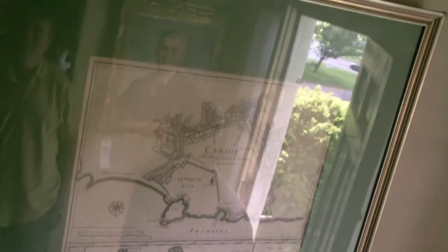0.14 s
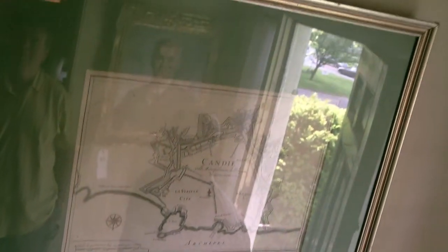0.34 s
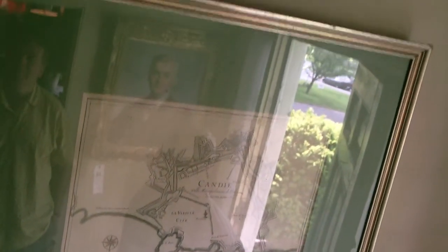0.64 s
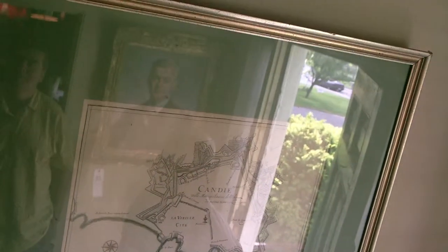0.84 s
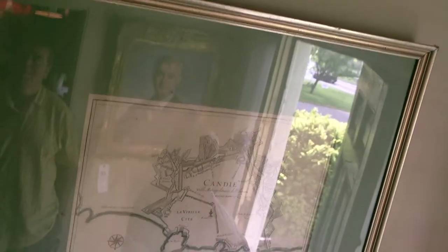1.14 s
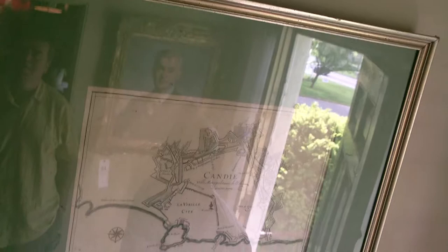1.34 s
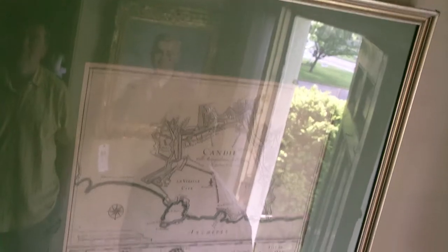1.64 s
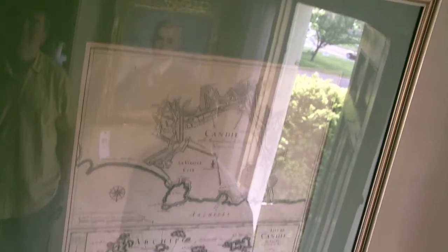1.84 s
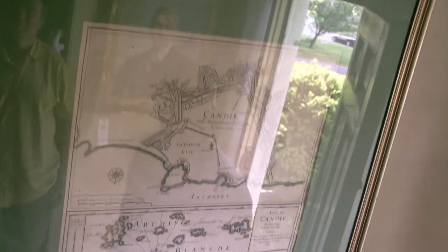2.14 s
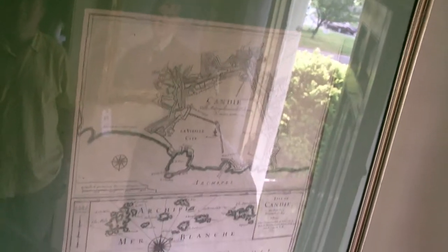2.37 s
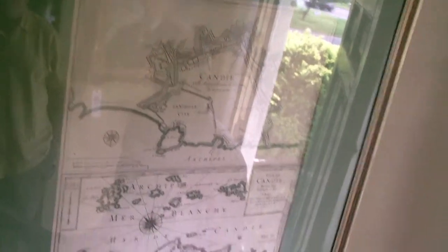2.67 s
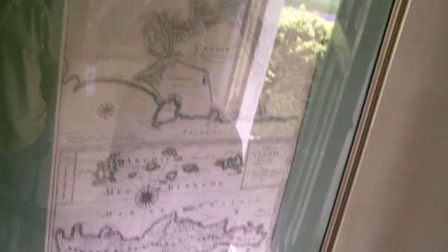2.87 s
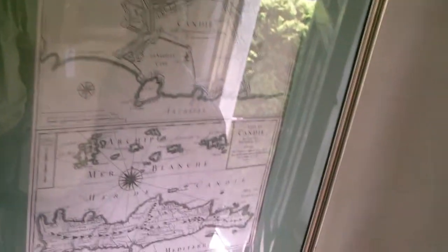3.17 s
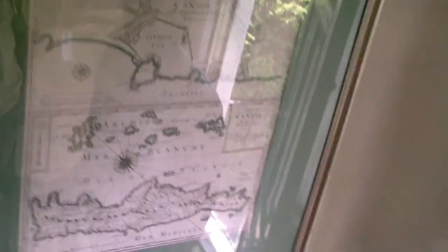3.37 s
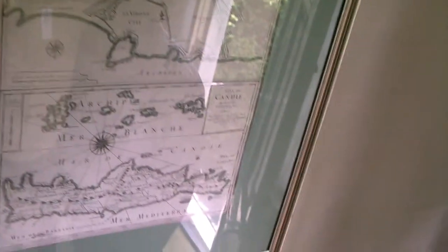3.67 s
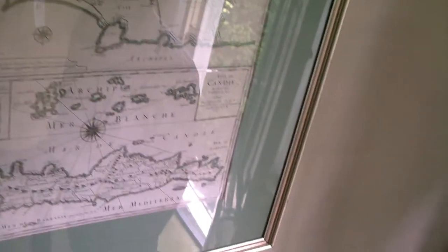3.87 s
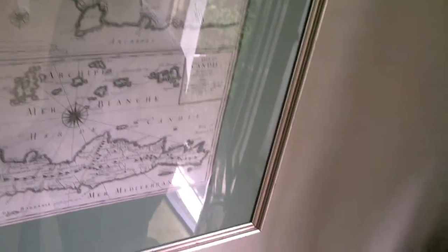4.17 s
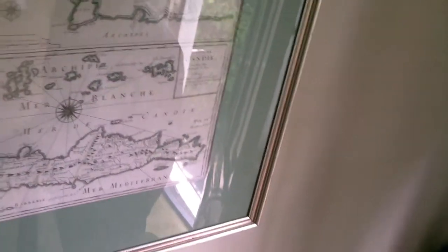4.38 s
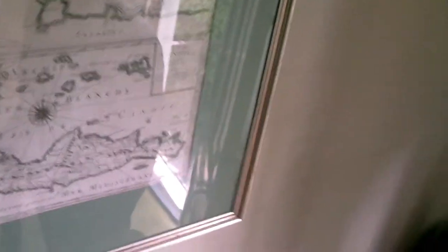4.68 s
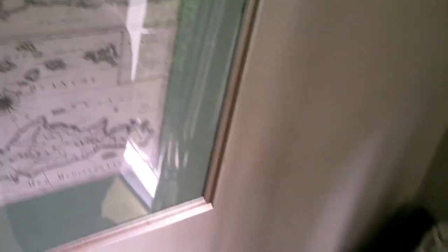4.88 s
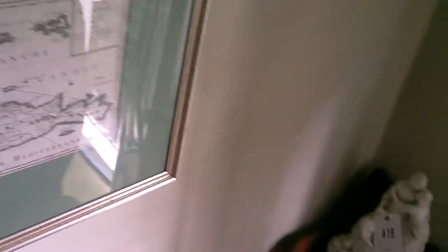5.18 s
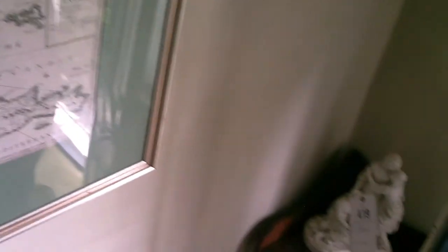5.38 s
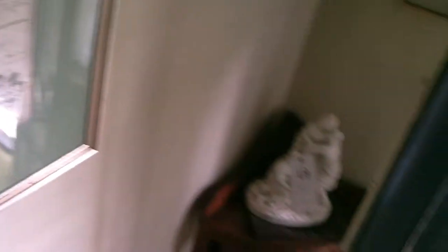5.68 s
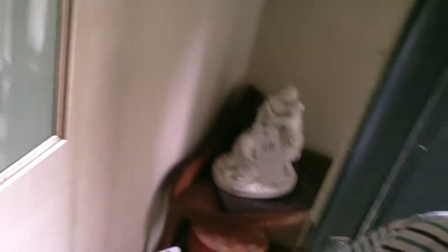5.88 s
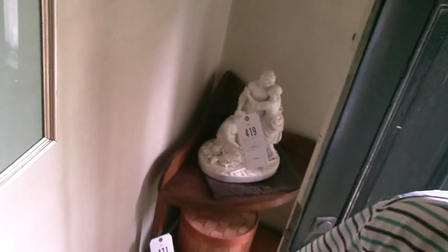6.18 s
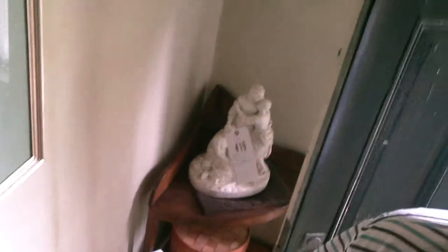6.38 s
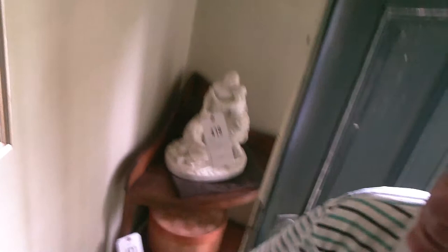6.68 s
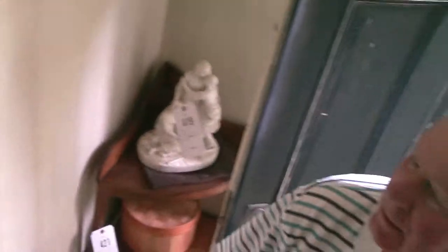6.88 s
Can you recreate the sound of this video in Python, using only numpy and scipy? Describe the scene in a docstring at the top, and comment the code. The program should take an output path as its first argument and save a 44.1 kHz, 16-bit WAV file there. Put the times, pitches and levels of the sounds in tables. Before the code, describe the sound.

A vehicle pulls away outside a quiet room with a low drone and tyre noise, while fingers tick on a handheld camera.

```python
"""A vehicle pulls away outside the open door of a quiet room: its exhaust drone climbs with the firing
rate and drops at a gear change, and its tyre roar swells past. Road noise lies behind it, and a near
wall's echo hollows one band of both. Far traffic booms in the room's modes beside a low hum.
Fingers tick and slip on a hand-held camera, cloth rustles, and the electronics whine faintly.
Low rumble surges now and then, and narrow tones near 500 Hz sound as the engine revs."""
import sys
import numpy as np
from scipy import signal
from scipy.fft import rfft, irfft
from scipy.io import wavfile
from scipy.ndimage import uniform_filter1d

SR = 44100
rng = np.random.default_rng(int(sys.argv[2]) if len(sys.argv) > 2 else 0)


def dump_mix(stems):
    """Bounce the given channels to the path in sys.argv[1] as a 16-bit WAV at rate SR."""
    frames = np.atleast_2d(stems).T  # one column per channel
    limited = np.clip(frames, -1, 1)  # hard clip at full scale
    pcm = np.round(limited * 32767).astype(np.int16)
    wavfile.write(sys.argv[1], SR, pcm)


N = 309582
TIME_S = np.arange(N) / SR


def gain_of(db):
    return 10 ** (np.asarray(db) / 20)


def lean_left(db):
    """Stereo gains: left up by db, right down by db."""
    return gain_of([[db], [-db]])


def unit_rms(x):
    return x / np.sqrt(np.mean(x ** 2) + 1e-20)


def over_frequency(rows, hz):
    """Table value at hz, interpolated in log frequency."""
    row_hz, value = np.transpose(rows)
    return np.interp(np.log(hz + 1), np.log(row_hz + 1), value)


def over_time(rows):
    """One per-sample curve for each column after time."""
    row_s, *columns = np.transpose(rows)
    return [np.interp(TIME_S, row_s, column) for column in columns]


def add(mix, start_s, sound):
    part = mix[..., round(start_s * SR):][..., :sound.shape[-1]]
    part += sound[..., :part.shape[-1]]


def resonate(x, hz, width_hz):
    """Unity-gain resonance: shift hz (fixed or sliding) to zero, smooth, shift back."""
    carrier = np.exp(2j * np.pi * np.cumsum(hz * np.ones(x.shape[-1])) / SR)
    pole = np.exp(-np.pi * width_hz / SR)
    return 2 * (carrier * signal.lfilter([1 - pole], [1, -pole], x / carrier + 1e-18)).real


def band(x, hz, width_hz):
    """Two equal resonances in series."""
    return resonate(resonate(x, hz, width_hz), hz, width_hz)


def drift(rate_hz):
    """Slow random curve, unit RMS."""
    span = max(round(SR / rate_hz), 1)
    return unit_rms(uniform_filter1d(uniform_filter1d(rng.standard_normal(N), span), span))


# Likeness of the two microphone ports: (frequency [Hz], coherence [0-1])
PORT_COHERENCE = [(60, 0.94), (130, 0.94), (290, 0.96), (640, 0.92), (1410, 0.84), (3100, 0.24),
                  (6820, 0.032), (15000, 0.28)]
# Port imbalance: (frequency [Hz], left minus right [dB])
PORT_BALANCE = [(60, 3), (240, 1), (950, 1.0), (3770, 1.5), (15000, 1)]
# Phase between the ports: (frequency [Hz], left lead [rad])
PORT_PHASE = [(100, 0), (1700, 0.19), (3600, 0.85), (5000, 0), (7000, 0.23)]


def port_spectra(fft_size):
    """Random short-time spectra at two ports, alike in the bass, mostly unrelated in the treble."""
    hz = np.fft.rfftfreq(fft_size, 1 / SR)
    a, b, c, d = rng.standard_normal((4 * N // fft_size + 5, len(hz), 4)).T
    coherence = over_frequency(PORT_COHERENCE, hz)[:, None]
    left = a + 1j * b
    right = coherence * left + np.sqrt(1 - coherence ** 2) * (c + 1j * d)
    tilt = gain_of(over_frequency(PORT_BALANCE, hz) / 2)[:, None]
    lag = np.exp(-1j * over_frequency(PORT_PHASE, hz))[:, None]
    return hz, np.array([left * tilt, right / tilt * lag])


def coloured_noise(spectrum, patch_db, ridge_db=2.46, fft_size=4096):
    """Unit-RMS stereo noise with drifting patches and the narrow, lasting ridges of standing waves."""
    hz, bins = port_spectra(fft_size)
    patches, ridges = rng.standard_normal((*bins.shape[:0:-1], 2)).T
    patches = unit_rms(uniform_filter1d(uniform_filter1d(patches, size=30, axis=0), size=5, axis=1))
    ridges = unit_rms(uniform_filter1d(uniform_filter1d(ridges, size=2, axis=0), size=30, axis=1))
    in_band = (hz >= spectrum[0][0]) & (hz <= spectrum[-1][0])
    level_db = over_frequency(spectrum, hz)[:, None] + patch_db * patches + ridge_db * ridges
    bins = bins * in_band[:, None] * gain_of(level_db)
    return unit_rms(signal.istft(bins, nperseg=fft_size, noverlap=fft_size * 3 // 4)[1][:, :N])


def electronics_whine(hz=8753, rms_db=-79):
    """Thin steady tone of the camera's electronics."""
    return np.sqrt(2) * gain_of(rms_db) * np.sin(2 * np.pi * hz * TIME_S)


# Microphone self-noise: (frequency [Hz], relative density [dB])
MIC_SPECTRUM = [(3000, -16), (7000, -5), (8600, 1.5), (10000, 1.5), (11500, -1), (13400, -1), (14500, 0.5),
                (15400, -3)]


def mic_noise(swell_db, base_db=-60):
    """Treble self-noise of the microphones, its level moved by swell_db."""
    return gain_of(base_db + swell_db) * coloured_noise(MIC_SPECTRUM, patch_db=2.0)


# Low room modes: (frequency [Hz], width [Hz], base level [dB])
ROOM_MODES = [(34, 24, -38), (52.84, 5.7, -29.5), (67.1, 12.7, -32), (76.45, 3.1, -35.5),
              (92.46, 12.7, -32.5)]
# Swell of the modes: (time [s], deep gain [dB], upper gain [dB])
MODE_SWELL = [(0, 6, 0), (.25, -2, 0), (1, 0, 3), (1.4, 0, -2), (2.8, 1, -4), (3.9, -2, -7), (4.3, 0, -5),
              (5.2, -7, -7), (5.7, -3, -5), (7.02, -1, -4)]


def room_boom(deep_below_hz=60):
    """Far traffic feeds each low mode of the room, which wanders in level."""
    out = np.zeros((2, N))
    deep_db, upper_db = over_time(MODE_SWELL)
    for hz, width_hz, db in ROOM_MODES:
        common, side = rng.standard_normal((2, N))
        rumble = np.array([common + 0.034 * side, common - 0.058 * side])
        swell_db = deep_db if hz < deep_below_hz else upper_db
        out += gain_of(db + swell_db) * unit_rms(band(rumble, hz, width_hz))
    return out * lean_left(db=.8)


# Hum from outside: (time [s], level [dB])
HUM_LEVEL = [(0, -40), (1.2, -43), (1.4, -32), (1.72, -31), (1.85, -43), (2.8, -43), (3.4, -50),
             (7.02, -50)]


def outside_hum(hz=116.2, width_hz=6.4):
    """Low tone plus narrow noise, strongest as the vehicle pulls away."""
    level_db, = over_time(HUM_LEVEL)
    waver = unit_rms(band(rng.standard_normal(N), hz, width_hz))
    steady = np.sqrt(2) * np.sin(2 * np.pi * hz * TIME_S)
    return gain_of(level_db) * (steady + 0.64 * waver) * lean_left(db=.8)


# Road noise: (time [s], low roar [dB], tyre roar [dB], hiss [dB])
ROAD_LEVELS = [(0, -36, -46, -53), (.6, -33.5, -47, -54), (1.15, -35, -43.5, -54), (1.4, -32.5, -48, -52.5),
               (2.25, -32, -42.5, -49.5), (4.35, -32.5, -41.5, -49), (4.65, -31.5, -42.5, -47),
               (5.5, -33.5, -42, -51), (5.95, -33, -41.5, -48.5), (6.6, -33.5, -44, -52),
               (7.02, -32.5, -43.5, -48.5)]
# Spectra of those three layers: (frequency [Hz], relative density [dB])
LOW_ROAR_SPECTRUM = [(12, -38), (20, -4), (81, -5.5), (98, -7), (134, -7), (195, -13.5), (300, -11.5),
                     (448, -18), (700, -19.5), (910, -69), (1540, -120)]
TYRE_SPECTRUM = [(400, -8), (520, -9.5), (680, -7), (800, 1.5), (1050, -2), (1600, -12.5), (2000, -12.5),
                 (2800, -19.5)]
HISS_SPECTRUM = [(1200, -41), (2000, -3), (3000, -4), (4500, -7.5), (6000, -12.5), (7200, -15),
                 (9000, -35.5)]


def road():
    """Low roar, tyre roar and hiss swell as vehicles go by; the microphone noise follows the hiss."""
    low_db, tyre_db, hiss_db = over_time(ROAD_LEVELS)
    flutter = drift(rate_hz=45)  # quick gusts shared across the treble
    low = gain_of(low_db) * coloured_noise(LOW_ROAR_SPECTRUM, patch_db=0.04)
    tyres = gain_of(tyre_db + 0.58 * flutter) * coloured_noise(TYRE_SPECTRUM, patch_db=0.03)
    hiss = gain_of(hiss_db + 0.37 * flutter) * coloured_noise(HISS_SPECTRUM, patch_db=1.24)
    return low + tyres + hiss + mic_noise(swell_db=0.62 * (hiss_db - hiss_db.mean()) + 0.39 * flutter)


# Ticks and low surges: (time [s], envelope peak [dB], pitch [Hz], rise [ms])
TICKS_AND_SURGES = [(2.159, -26, 850, 5), (2.356, -29, 855, 5), (2.808, -37, 3300, .7),
                    (2.817, -44, 3200, .6), (3.1409, -33, 3600, .1), (3.1414, -29, 2000, .22),
                    (4.015, -15, 72, 22), (4.1783, -40, 10500, .09), (4.6364, -28, 2100, .17),
                    (4.637, -27, 2900, .17), (5.655, -17, 55, 35), (6.228, -33, 2000, .2),
                    (6.278, -32, 1800, .15), (6.8156, -35, 3100, .16), (6.8543, -43, 5300, .3)]


def ticks_and_surges():
    """Sharp clicks, brief rings and two soft swells of low rumble: each a sine that swells and dies."""
    out, t = np.zeros((2, N)), TIME_S[:12000]
    for start_s, db, hz, rise_ms in TICKS_AND_SURGES:
        age = 1000 * t / rise_ms
        add(out, start_s, gain_of(db) * age * np.exp(1 - age) * np.sin(2 * np.pi * hz * t))
    return out


def burst(length_s, hz, width_hz, grain_db=2.5):
    """Soft, grainy burst of band noise."""
    n = round(length_s * SR)
    common, left, right, grains = rng.standard_normal((4, SR))
    roughness = gain_of(grain_db * grains.repeat(100)[:SR])
    noise = (common + .5 * np.array([left, right])) * roughness
    return unit_rms(band(noise, hz, width_hz)[:, -n:]) * np.hanning(n)


# Short noise swells: (time [s], length [s], body [dB], centre [Hz], width [Hz], fizz [dB])
NOISE_SWELLS = [(0, .17, -22.5, 56.4, 6, -64), (0, .33, -62, 4300, 700, -75),
                (1.29, 0.13, -35, 187, 52, -59), (1.36, 0.15, -39.5, 495, 15, -68),
                (1.46, .1, -44, 525, 19, -70), (1.65, 0.056, -40, 512, 27, -70),
                (1.98, 0.34, -33, 163, 100, -65), (4.45, .7, -62, 10500, 3500, -84),
                (4.56, 0.15, -69, 2600, 2200, -55), (6.101, 0.083, -60, 3020, 2000, -56),
                (6.226, 0.091, -42, 820, 990, -53), (6.522, 0.15, -19.5, 33, 19, -65),
                (6.545, 0.044, -39, 870, 650, -55), (6.802, 0.065, -40, 1550, 710, -51.5)]


def noise_swells():
    """An opening low boom, narrow tones near 500 Hz as the engine revs, and cloth and grip rustles."""
    out = np.zeros((2, N))
    for start_s, length_s, body_db, hz, width_hz, fizz_db in NOISE_SWELLS:
        body = gain_of(body_db) * burst(length_s, hz, width_hz)
        fizz = gain_of(fizz_db) * burst(length_s, hz=4230, width_hz=4500)
        add(out, start_s, body + fizz)
    return out


# Fingertip jerks: (time [s], level [dB])
FINGER_SLIPS = [(1.346, -57), (1.359, -55), (1.378, -56), (1.393, -54), (1.41, -56)]


def finger_slips():
    """A fingertip slips over the case in tiny bright jerks."""
    out = np.zeros((2, N))
    for start_s, db in FINGER_SLIPS:
        add(out, start_s, gain_of(db) * burst(length_s=.011, hz=5600, width_hz=2400))
    return out


# Band cancelled by the wall: (time [s], centre [Hz], depth [0-1])
WALL_NOTCH = [(0, 665, 0.4), (1.5, 662, 0.5), (3, 670, 0.58), (3.8, 637, 0.12), (4.5, 550, 0.16),
              (5.3, 483, 0.28), (7.02, 520, 0.53)]


def near_wall(x, width_hz=150):
    """The wall's echo partly cancels one band, which slides as the camera turns."""
    hz, depth = over_time(WALL_NOTCH)
    return x - depth * resonate(x, hz, width_hz)


# Close tyre roar: (time [s], level [dB])
PASS_LEVEL = [(0, -51), (.6, -43.5), (1.5, -43), (2.2, -37), (2.9, -40.5), (3.6, -41), (4.5, -44.5),
              (7.02, -48.5)]
# Its spectrum: (frequency [Hz], relative density [dB])
PASS_SPECTRUM = [(700, -7.5), (820, -0.5), (1200, -1), (1800, -5.5), (2100, -15.5), (3000, -22.5)]
# Bands singing in it: (centre [Hz], width [Hz], level re roar [dB])
SINGING_BANDS = [(865, 45, -14), (957, 35, -18), (1045, 35, -20)]


def passing_tyres(waver_db=3):
    """Bright tyre roar of the vehicle going by close; its singing bands come and go."""
    level_db, = over_time(PASS_LEVEL)
    roar = coloured_noise(PASS_SPECTRUM, patch_db=1.5)
    singing = sum(gain_of(db + waver_db * drift(rate_hz=11)) * unit_rms(band(roar, hz, width_hz))
                  for hz, width_hz, db in SINGING_BANDS)
    return gain_of(level_db) * (roar + singing)


# Door and room resonances: (centre [Hz], width [Hz], peak gain [dB], onset [s])
DOORWAY_RESONANCES = [(274, 21, 4, 4.3), (298.5, 4.5, 3, 4.3), (345, 70, 2, 2.35), (495, 40, -6, 0),
                      (592, 42, -4, 4), (648, 30, -1, 3.8)]


def doorway_gain(hz, fade_in_s=.25):
    """Resonances lift an overtone crossing them; the camera walks into each at its own time."""
    gain = np.zeros(N)
    for centre_hz, width_hz, peak_db, onset_s in DOORWAY_RESONANCES:
        arrived = np.clip((TIME_S - onset_s) / fade_in_s, 0, 1)
        gain += gain_of(peak_db) * arrived / (1 + (2 * (hz - centre_hz) / width_hz) ** 4)
    return gain


# Pull-away, slip, long climb, gear change: (time [s], firing rate [Hz])
FIRING_RATE = [(1.25, 48), (1.33, 55), (1.5, 78.5), (1.75, 77), (2.2, 68), (4, 83.4), (4.5, 89.3),
               (5.5, 99.6), (5.86, 102.8), (5.97, 93), (6.06, 78), (6.3, 68), (7.02, 71)]
# Drone booming and fading across the room's modes: (time [s], level [dB])
DRONE_LEVEL = [(1.25, -26), (1.36, -17), (1.45, -14), (1.6, -18), (1.64, -24), (1.7, -12), (1.92, -21),
               (1.99, -13), (2.26, -29), (2.45, -17), (2.56, -30), (2.78, -16), (3.27, -15), (3.4, -31.5),
               (3.48, -18.5), (3.84, -22), (3.9, -41), (4.08, -25.5), (4.17, -39), (4.45, -23),
               (4.68, -29.5), (4.9, -25.5), (5.3, -22), (5.45, -25.5), (5.54, -41), (5.67, -19.5),
               (5.78, -40), (5.92, -24.5), (6.01, -24.5), (6.13, -14), (6.26, -20), (6.32, -35), (6.4, -15),
               (6.48, -39), (6.59, -22.5), (6.65, -39), (6.73, -18), (6.85, -37), (6.94, -18.5),
               (7.02, -26.5)]
# Exhaust overtones: (multiple of firing rate, base level [dB])
EXHAUST_OVERTONES = [(3, -44), (4, -45), (5, -45), (6, -44), (7, -47.5)]
FULL_LOAD_HZ_PER_S, HARD_REV_HZ_PER_S = 8.4, 90
LUMPY_DB, OFF_LOAD_DB, HARD_REV_DB = 2.5, -15.5, -1
WAVER_DB, WAVER_RAD = 2.6, .8


def exhaust(ease_s=.15, fade_in_s=.073):
    """Near-pure drone at the firing rate; off load it turns lumpy and its wavering overtones weaken."""
    firing_hz, = over_time(FIRING_RATE)
    drone_db, = over_time(DRONE_LEVEL)
    climb_hz_per_s = uniform_filter1d(np.gradient(firing_hz) * SR, size=round(ease_s * SR))
    off_load = 1 - np.clip(climb_hz_per_s / FULL_LOAD_HZ_PER_S, 0, 1) ** 2
    hard_rev = np.clip(climb_hz_per_s / HARD_REV_HZ_PER_S, 0, 1) ** 2  # lets every overtone through
    phase = 2 * np.pi * np.cumsum(firing_hz * (1 + 0.0035 * drift(rate_hz=9.05))) / SR
    lumps_db = (0.16 + LUMPY_DB * off_load) * drift(rate_hz=16)
    out = gain_of(drone_db + lumps_db) * np.sin(phase)
    for multiple, db in EXHAUST_OVERTONES:
        lift = doorway_gain(multiple * firing_hz) + gain_of(HARD_REV_DB) * hard_rev
        level = gain_of(db + OFF_LOAD_DB * off_load + WAVER_DB * drift(rate_hz=12))
        out += lift * level * np.sin(multiple * phase + WAVER_RAD * drift(rate_hz=5.6))
    fade_in = np.clip((TIME_S - DRONE_LEVEL[0][0]) / fade_in_s, 0, 1)
    return np.sqrt(2) * out * fade_in * lean_left(db=.8)


def scene():
    """Street sound by way of the wall, plus the room's low end, brief sounds and the whine."""
    street = near_wall(exhaust() + road() + passing_tyres())
    low_end = room_boom() + outside_hum()
    brief_sounds = (ticks_and_surges() + noise_swells() + finger_slips()) * lean_left(db=.7)
    return street + low_end + brief_sounds + electronics_whine()


NOTCH_HZ, NOTCH_HALF_WIDTH_HZ, NOTCH_DB = 7740, 130, -27
CUTOFF_HZ = 15250


def record(dry):
    """Narrow treble notch, then the band limit."""
    hz = np.fft.rfftfreq(N, 1 / SR)
    notch = gain_of(NOTCH_DB / (1 + ((hz - NOTCH_HZ) / NOTCH_HALF_WIDTH_HZ) ** 4))
    notched = irfft(rfft(dry) * notch, N)
    lowpass = signal.firwin(511, CUTOFF_HZ, window=("kaiser", 9), fs=SR)
    return signal.oaconvolve(notched, lowpass[None], "same")


dry = scene()
out = record(dry)
dump_mix(out)
```